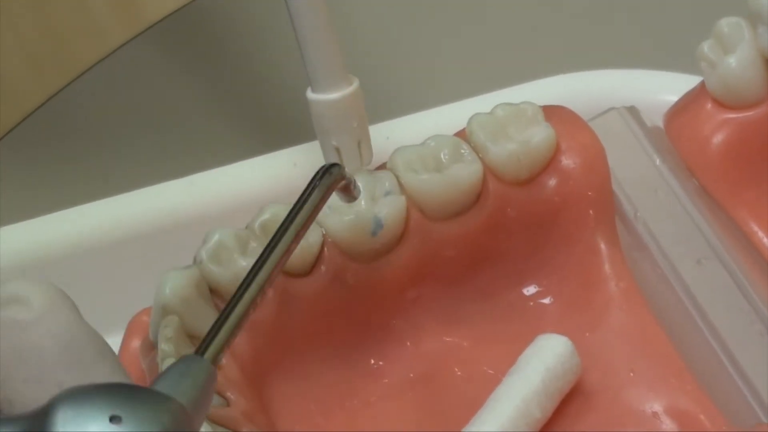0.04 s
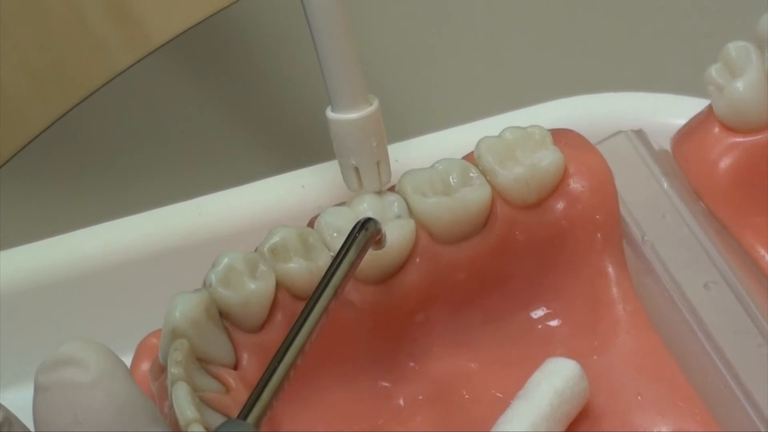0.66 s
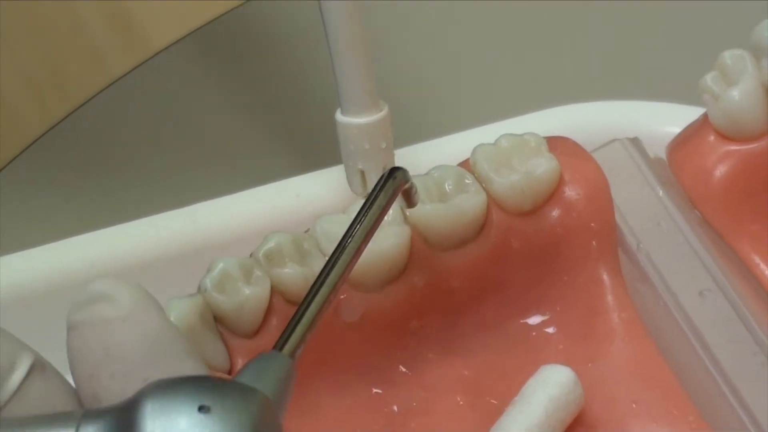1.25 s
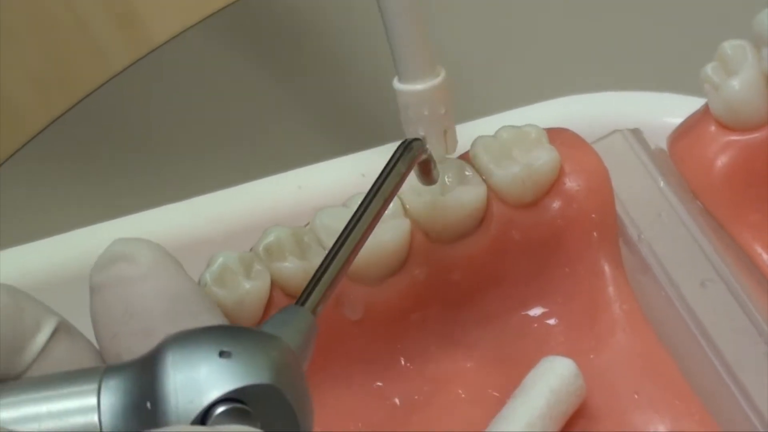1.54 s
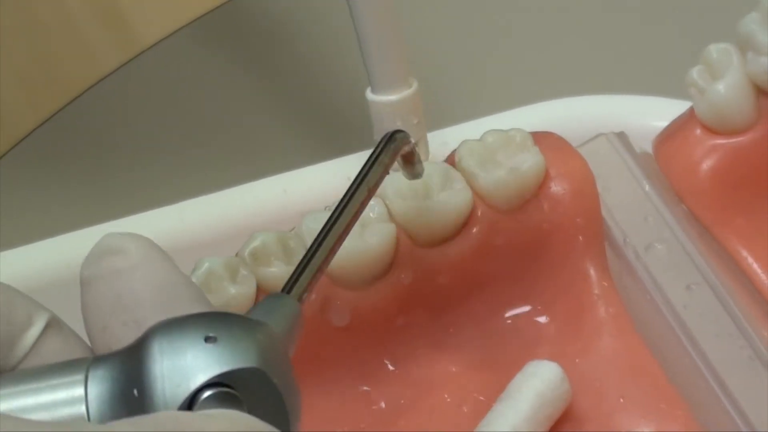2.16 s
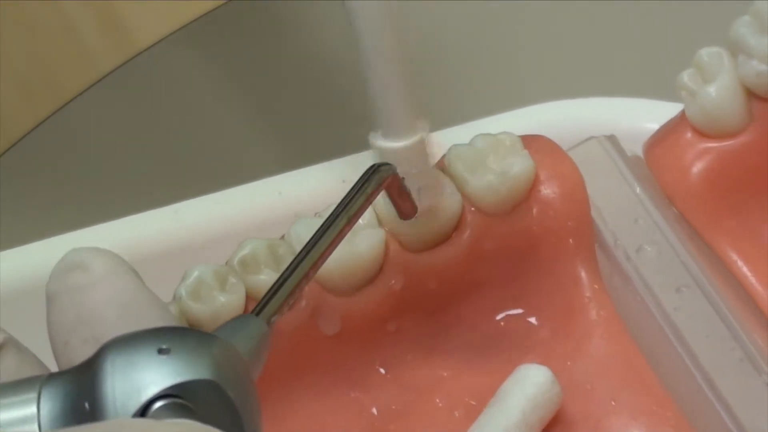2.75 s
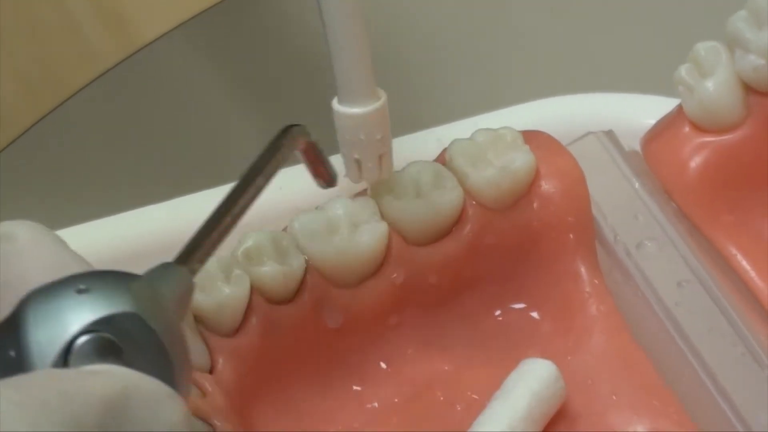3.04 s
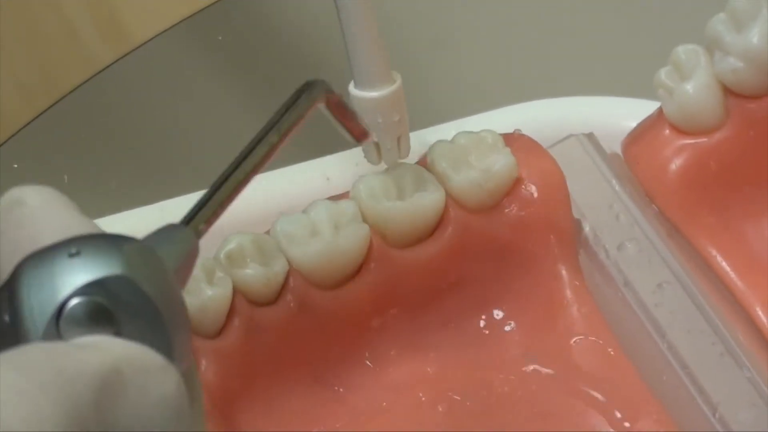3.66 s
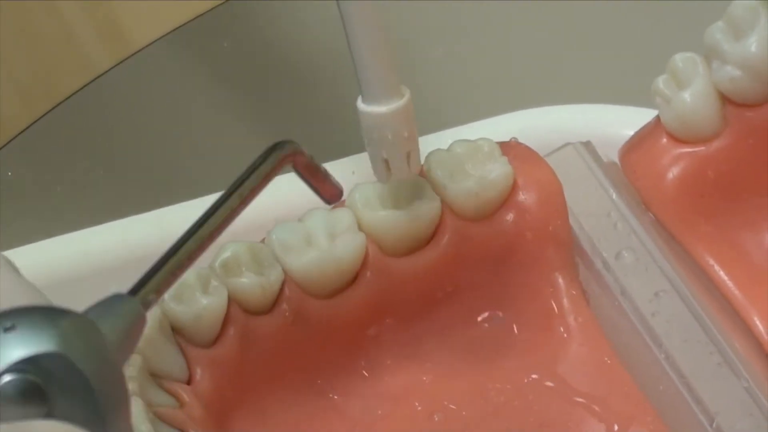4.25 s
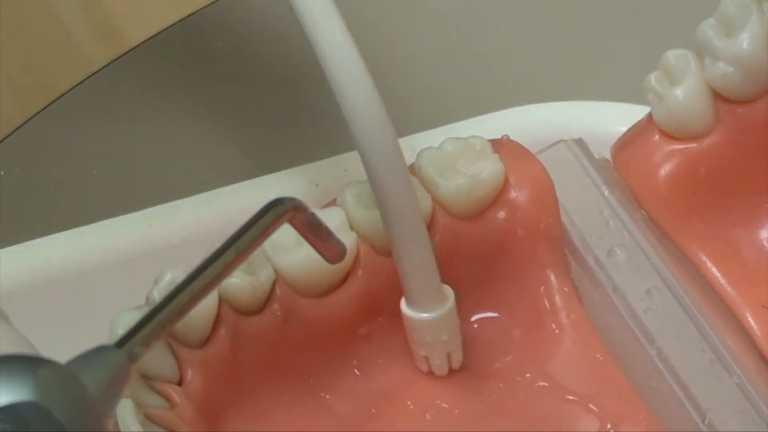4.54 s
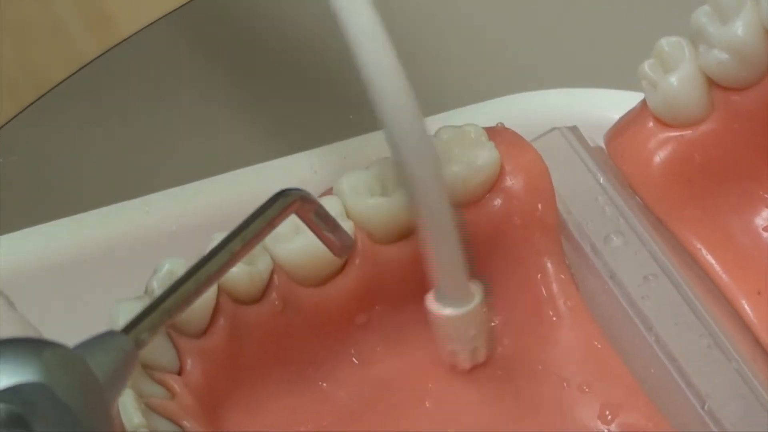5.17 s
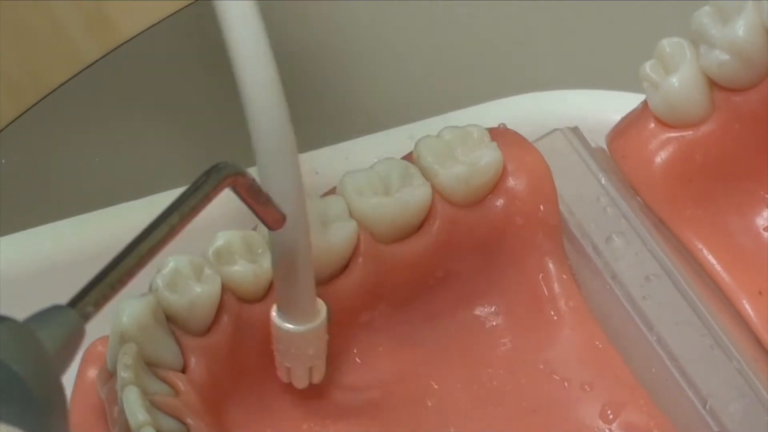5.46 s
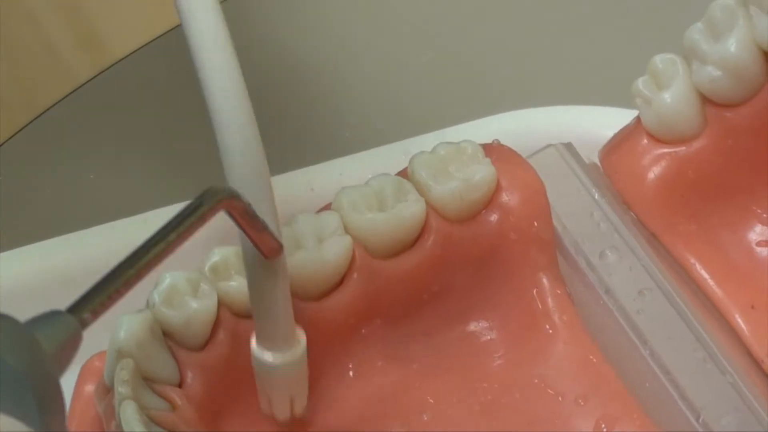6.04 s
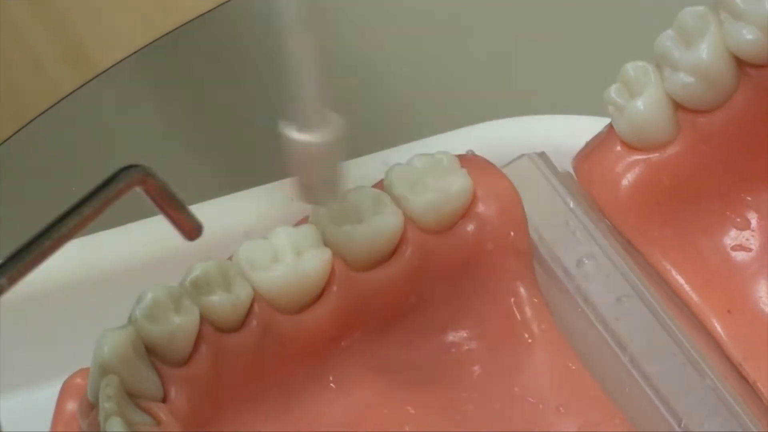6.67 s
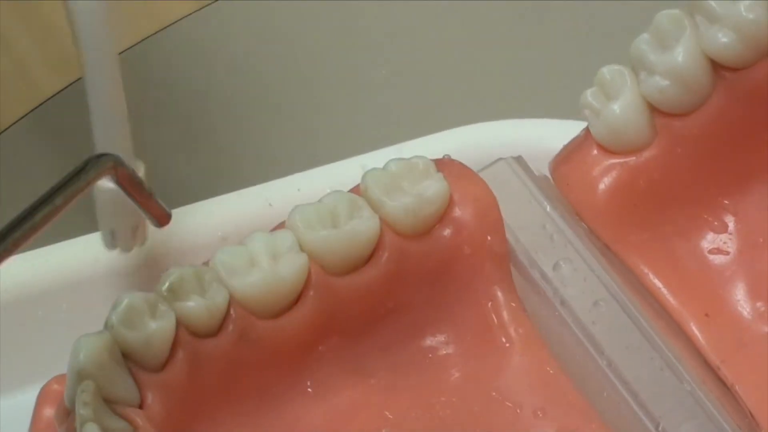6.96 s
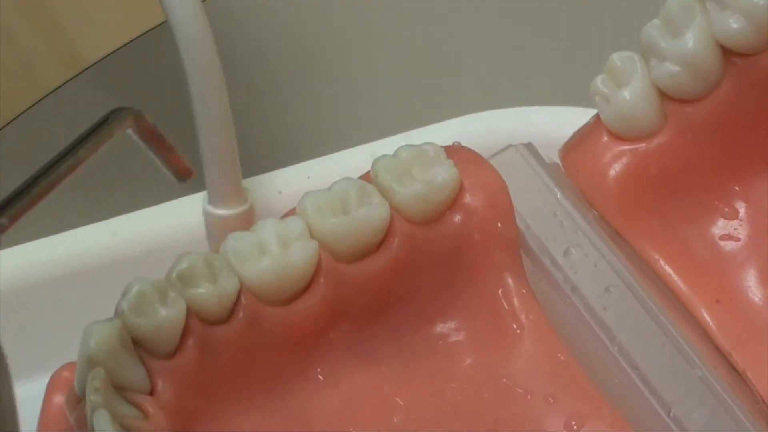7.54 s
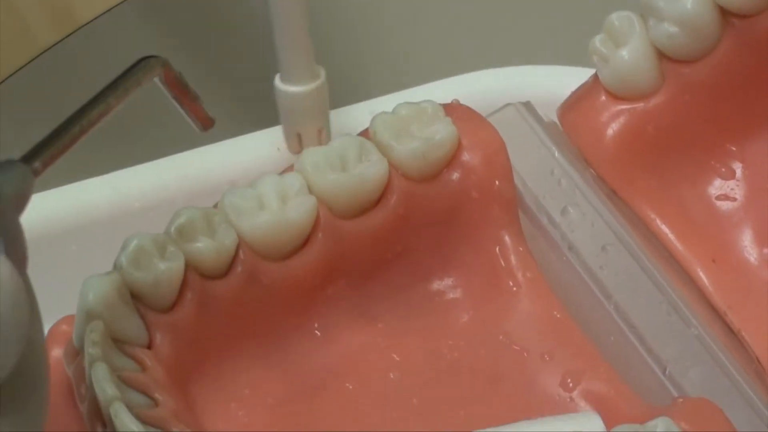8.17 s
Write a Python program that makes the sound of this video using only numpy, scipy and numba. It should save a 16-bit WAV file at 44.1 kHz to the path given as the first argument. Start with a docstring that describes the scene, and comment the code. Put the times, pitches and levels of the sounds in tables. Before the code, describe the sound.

Close to the microphone and centred, air tears through the slots of a dental suction tip in a high, shimmering hiss. Spray from an air-water syringe rushes over plastic teeth in uneven gusts. Midway the suction whistles more and slurps water in brief sizzles while the tip knocks on the model jaw; then the taps fade back and the hiss carries on. The room adds a low electrical hum and soft ventilation.

```python
"""Dental suction and rinse on a training jaw

Close to a plastic jaw, on a camera's stereo microphone, the mouth in the centre.
Air hisses and whistles through a suction tip's slots, water sizzles in them, and the tip taps the jaw,
while the jet of an air-water syringe rushes over the teeth. Mains hum and ventilation lie underneath
and duck as the camera's gain control follows the hiss."""
import sys
import numpy as np
from scipy import signal
from scipy.fft import rfft, irfft
from scipy.io import wavfile
from scipy.ndimage import uniform_filter1d
from numba import njit

SR = 44100
rng = np.random.default_rng(int(sys.argv[2]) if len(sys.argv) > 2 else 0)


def output_pcm(signal):
    """Save a mono or channel-first signal as 16-bit PCM at the path in sys.argv[1].

    Samples are clipped to [-1, 1] before scaling.
    """
    pcm = np.clip(np.atleast_2d(signal).T, -1, 1) * 32767
    wavfile.write(sys.argv[1], SR, np.round(pcm).astype(np.int16))


N = 366030
FRAME, HOP = 512, 128  # samples
TIME = np.arange(N) / SR
FRAME_S = np.arange(N // HOP + 2) * HOP / SR
BIN_HZ = np.maximum(np.arange(FRAME // 2 + 1), .5)[:, None] * SR / FRAME
SPECTRUM_HZ = np.maximum(np.fft.rfftfreq(N, 1 / SR), 1)

# The jet catches a tooth or hollow; deeper in, the rush reaches lower. Stray air lifts the slots' hiss:
# start_s, end_s, swell_s, level_db, first_edge_hz, last_edge_hz, lift_db
JET_GUSTS = [(0.327, 0.43, 0.036, -57, 2800, 2800, 0), (0.397, 1.195, 0.38, -58.5, 900, 845, 0),
             (0.828, 1.02, 0.055, -52, 2500, 2300, 2.5), (1.64, 2.263, 0.2, -53.5, 1400, 2380, 5),
             (1.966, 2.132, 0.14, -43.5, 3700, 3400, -1), (3.082, 3.627, 0.036, -50, 2180, 2270, 0.5),
             (3.286, 3.64, 0.35, -46, 2840, 2570, 1), (3.59, 3.869, 0.088, -47.5, 1430, 720, 3),
             (4.027, 4.23, 0.1, -52, 614, 674, 1), (4.54, 4.89, 0.18, -64, 3560, 3930, 2.5),
             (4.4, 5.417, 0.11, -54, 3200, 3680, 0), (5.64, 5.935, 0.28, -51.5, 1800, 2040, -3.5),
             (6.177, 6.54, 0.19, -67, 3500, 4200, 5), (6.227, 6.246, .02, -50.5, 2100, 2100, 3),
             (6.544, 6.607, 0.034, -50, 3300, 3500, 2), (6.74, 7.038, 0.17, -50.5, 2350, 2160, 3),
             (7.215, 7.38, 0.083, -59, 2000, 1800, -2.5), (7.202, 8.304, 0.062, -58.5, 1700, 1230, 2)]


def amp(db):
    """Decibels to gain."""
    return 10 ** (np.asarray(db) / 20)


def controls(table):
    """A curve per frame for each column that follows the table's time column."""
    times_s, *columns = np.transpose(table)
    return [np.interp(FRAME_S, times_s, column) for column in columns]


def colour(table, hz):
    """A spectrum in dB, straight between its points on a log-frequency axis."""
    points_hz, db = np.transpose(table)
    return np.interp(np.log(hz), np.log(points_hz), db)


def bump(hz, width_hz):
    """A bell-shaped resonance of height 1."""
    return np.exp(-((BIN_HZ - hz) / width_hz) ** 2)


def wander(width_hz, seconds):
    """Smooth random patches of the given width and length, with a spread of 1."""
    field = rng.standard_normal((len(BIN_HZ), len(FRAME_S)))
    for _ in range(2):
        field = uniform_filter1d(field, max(1, int(width_hz * FRAME / SR)), axis=0)
        field = uniform_filter1d(field, max(1, int(seconds * SR / HOP)), axis=1)
    return field / field.std()


def turbulence(db):
    """Noise with a moving spectrum, given in dB per Hz."""
    white = rng.standard_normal((len(FRAME_S) - 1) * HOP) * np.sqrt(SR / 2)
    frames = signal.stft(white, nperseg=FRAME, noverlap=FRAME - HOP)[2]
    return signal.istft(frames * amp(db), nperseg=FRAME, noverlap=FRAME - HOP)[1][:N]


def shape(x, db):
    """Pass a sound through a steady response, given in dB along SPECTRUM_HZ."""
    return irfft(rfft(x) * amp(db), N)


def room(hum_trim_db=-0.5, side_db=-16):
    """Steady hum in the centre, and ventilation noise that differs slightly between left and right."""
    # Mains hum and a motor shaft: pitch_hz, level_db
    hum_tones = [(59.24, -45), (119.97, -30.2), (215.4, -54), (239.94, -60)]
    # Ventilation noise: frequency_hz, level_db_per_hz
    ventilation = [(25, -80), (70, -69), (160, -70), (215, -66), (290, -68.5), (370, -67.5), (450, -64.5),
                   (500, -74), (620, -68.5), (900, -70.5), (1400, -101), (5000, -107)]
    hum = sum(amp(db) * np.sqrt(2) * np.sin(2 * np.pi * (hz * TIME + rng.random()))
              for hz, db in hum_tones)
    white = rng.standard_normal((2, N)) * np.sqrt(SR / 2)
    mid, side = shape(white, colour(ventilation, SPECTRUM_HZ))
    return amp(hum_trim_db) * hum + mid + amp(side_db) * np.array([side, -side])


def tip_resonances():
    """The tip's short tube colours the air noise, and narrow gaps open, sing and close again (dB)."""
    # The tube's peaks and dips: centre_hz, width_hz, gain_db
    tube_ripple = [(2800, 200, 1.8), (3600, 200, 1.6), (4900, 230, -1.5), (5800, 180, -1.5),
                   (6150, 200, 1.8), (6550, 200, -1.5), (7000, 200, 1.8), (7400, 180, -1.2),
                   (7780, 180, 1.5), (8280, 220, -2.6)]
    # Gaps between tip, water and tooth: start_s, end_s, first_hz, last_hz, width_hz, boost_db
    gap_whistles = [ (1.262, 1.307, 5150, 5600, 240, 18), (1.575, 1.8, 10400, 9900, 1300, 5),
                    (2.374, 2.95, 10000, 9800, 1600, 4), (3.128, 3.27, 6400, 6300, 500, 5.5),
                    (3.45, 3.69, 4330, 4550, 445, 4.5), (3.85, 4.45, 15200, 15100, 600, 1),
                    (4.377, 5.503, 4400, 4550, 260, 7.5), (4.45, 6.65, 8400, 8300, 330, 5),
                    (4.95, 6.2, 12800, 12300, 700, 2.5), (6.148, 6.7, 4600, 4560, 300, 6),
                    (6.84, 7.065, 7200, 7500, 600, 2.5), (7.05, 7.263, 5350, 5750, 900, 7.5),
                    (7.253, 7.55, 11200, 10800, 450, 6.5), (7.242, 7.43, 13200, 14700, 500, 8),
                    (7.53, 7.68, 5900, 6100, 600, 4), (7.503, 7.76, 12200, 12800, 750, 9.5),
                    (7.79, 8.3, 11400, 12500, 900, 4.5)]
    db = sum(gain_db * bump(hz, width_hz) for hz, width_hz, gain_db in tube_ripple)
    for start, end, first_hz, last_hz, width_hz, boost_db in gap_whistles:
        progress = np.clip((FRAME_S - start) / (end - start), 0, 1)
        opening = np.sqrt(np.abs(np.sin(np.pi * progress)))
        pitch_hz = first_hz + (last_hz - first_hz) * progress
        db = db + boost_db * opening * bump(pitch_hz, width_hz)
    return db


def suction(ring_db, slot_width_hz=700, gulp_half_s=0.063, film_db=0.94, shimmer_db=1.4, flutter_db=.5):
    """Air tears through the tip's slots, harder when the jet blows across them."""
    # The draw as the tip moves from molars to gum to rim: time_s, level_db, sizzle_db, slot_db
    tip_draw = [(0, -50, 3, 5.5), (0.78, -47.5, 5, 7.5), (0.92, -50, -1, 11.5), (1.2, -47.5, 2, 9),
                (1.5, -52.5, 9.5, 7.5), (2.05, -44.5, -1, 2), (2.4, -50, 10, 6.5), (2.78, -48.5, 3.5, 0.5),
                (3.35, -43.5, 3, 7), (3.98, -48, 4, 3), (4.42, -51, 4.5, 3.5), (4.65, -44.5, 0.5, 7.5),
                (5.12, -46.5, 5.5, 7), (5.5, -46.5, 2, 6), (5.88, -43, -3, 7), (6.5, -47.5, 5, 4.5),
                (6.7, -49.5, 7, 2.5), (7.12, -53, 6.5, 7), (7.42, -49, -1, 1), (7.92, -54, 1.5, 5.5),
                (8.3, -46, 8, 6.5)]
    # The slot resonance, higher when the tip sits on the wet gum: time_s, pitch_hz
    slot_pitch = [(0, 7000), (2.3, 7360), (3.3, 7330), (4.4, 7600), (4.58, 7510), (6.5, 7350), (6.75, 7130)]
    # Colour of the hiss: frequency_hz, gain_db
    hiss_colour = [(300, -33.5), (600, -30.5), (900, -13.5), (1400, -26.5), (2200, -18.5), (2800, -15),
                   (3200, -13.5), (3600, -11), (4900, -12), (6200, -4.5), (8300, 0.5), (9200, 1.5),
                   (11500, -3), (15800, -10), (17500, -36)]
    # Gulps of water sizzle in the slots: time_s, treble_boost_db
    gulps = [(1.36, 4.5), (2.93, 6.5), (4.48, 10), (5.04, 5.5), (5.28, 2.5), (5.54, 4.5), (6.05, 1),
             (6.63, 0)]
    level_db, sizzle_db, slot_db = controls(tip_draw)
    slot_hz, = controls(slot_pitch)
    treble = np.clip((BIN_HZ - 9500) / 4500, 0, 1)
    gulp_db = sum(boost_db * np.exp(-((FRAME_S - s) / gulp_half_s) ** 2) for s, boost_db in gulps)
    lift_db = sum(db * gust(start, end, swell_s) for start, end, swell_s, *_, db in JET_GUSTS)
    hiss_db = level_db + colour(hiss_colour, BIN_HZ) + ring_db
    hiss_db += (sizzle_db + gulp_db) * treble
    hiss_db += lift_db * (1 - 0.9 * treble)  # stray air barely lifts the top
    hiss_db += (slot_db + 0.24 * lift_db) * bump(slot_hz, slot_width_hz)
    # The shifting water film makes the treble shimmer and the flow flutter.
    hiss_db += (film_db + shimmer_db * treble) * wander(width_hz=650, seconds=0.066)
    hiss_db += flutter_db * wander(width_hz=5200, seconds=.012)
    return turbulence(hiss_db)


def hose(x, peak_db=4.0, valley_db=-1.33, width_hz=24):
    """The suction hose's air column combs the middle of the hiss."""
    # Standing waves in the hose: pitch_hz
    standing_waves = [1351, 1462, 1552, 1622, 1743, 1860, 1985, 2070, 2173, 2255, 2345, 2540, 2793]
    comb = sum(np.exp(-((SPECTRUM_HZ - hz) / width_hz) ** 2) for hz in standing_waves)
    in_band = (SPECTRUM_HZ > standing_waves[0] - 150) & (SPECTRUM_HZ < standing_waves[-2])
    return shape(x, peak_db * comb + valley_db * in_band)


def syringe_rush(ring_db, spray_db=-69.5, spray_edge_hz=660, spatter_db=1.32):
    """The free jet sprays throughout and rushes on the teeth gust by gust, broken up by droplets."""
    # Colour of the rush: frequency_hz, gain_db
    rush_colour = [(700, -1.5), (1600, 0.5), (2200, -1.5), (2800, 1.5), (3300, -0.5), (4400, 0), (5000, 0),
                   (6200, 2), (8300, 3), (16000, -42)]
    power = amp(spray_db) ** 2 * hollow(spray_edge_hz) * np.ones(len(FRAME_S))
    for start, end, swell_s, level_db, first_hz, last_hz, _ in JET_GUSTS:
        strength = amp(level_db) * gust(start, end, swell_s)
        blowing = strength > 0
        edge_hz = np.interp(FRAME_S[blowing], [start, end], [first_hz, last_hz])
        power[:, blowing] += strength[blowing] ** 2 * hollow(edge_hz)
    droplets_db = spatter_db * wander(width_hz=2100, seconds=.009)
    return turbulence(10 * np.log10(power) + colour(rush_colour, BIN_HZ) + ring_db + droplets_db)


def hollow(edge_hz, steepness=5, focus_db=1.5):
    """A hollow cuts off the noise below its edge and resonates just above it (power gain)."""
    focus = amp(focus_db * bump(1.5 * edge_hz, width_hz=0.11 * edge_hz)) ** 2
    return focus / (1 + (edge_hz / BIN_HZ) ** steepness)


def gust(start, end, swell_s, release_s=0.064):
    """The jet swells onto a tooth, holds, and slips off (0-1)."""
    rise = np.clip((FRAME_S - start) / swell_s, 0, 1)
    return rise * np.clip(1 - (FRAME_S - end) / release_s, 0, 1)


def knock(pitch_spread=0.062, push_s=0.0021):
    """The soft plastic tip meets the jaw, at a slightly different spot each time."""
    # Modes of the plastic jaw: pitch_hz, t60_s, level_db
    jaw_modes = [(784, 0.022, 9), (913, 0.015, 27), (1066, 0.022, 17.5), (1620, 0.022, 0.5)]
    t = TIME[:SR // 16]
    detune = np.exp(pitch_spread * rng.standard_normal())
    ring = sum(amp(db - 60 * t / t60) * np.sin(2 * np.pi * hz * detune * t) for hz, t60, db in jaw_modes)
    ring *= 1 - np.exp(-(t / push_s) ** 2)  # soft contact rounds the attack
    return ring / np.abs(ring).max()


def taps(faint_db=-29, faint_count=90):
    """A few clear taps among many faint ones as the tip is dragged along."""
    # Clear knocks of the tip on the jaw: time_s, peak_db
    clear_taps = [(0.119, -22), (1.482, -27), (2.49, -23), (2.56, -20), (2.742, -13.5), (2.868, -18),
                  (4.366, -23), (4.443, -32.5), (4.598, -5), (4.748, -13.5), (5.007, -16), (5.27, -14),
                  (6.172, -9.5), (6.562, -21), (7.097, -22)]
    times_s = rng.uniform(0, TIME[-1], faint_count)
    peaks_db = faint_db + rng.uniform(-6, 6, faint_count)
    out = np.zeros(N + SR)
    for time_s, peak_db in [*clear_taps, *zip(times_s, peaks_db)]:
        tap = amp(peak_db) * knock()
        at = int(time_s * SR)
        out[at:at + len(tap)] += tap
    return out[:N]


def scene(side_delay_s=.007):
    """The mouth is close and central; a faint, delayed, coloured copy gives it a little stereo width."""
    # Stereo width, nearly mono but slightly wider at 6-10 kHz: frequency_hz, side_re_mid_db
    stereo_width = [(900, -46), (3500, -75), (4500, -66), (5700, -60), (6600, -19.5), (8200, -31.5),
                    (10000, -24.5), (11300, -49), (13000, -52)]
    ring_db = tip_resonances()
    mouth = hose(suction(ring_db) + syringe_rush(ring_db)) + taps()
    delayed = np.interp(TIME - side_delay_s, TIME, mouth, left=0)
    side = shape(delayed, colour(stereo_width, SPECTRUM_HZ))
    return mouth + np.array([side, -side]) + room()


@njit
def follow(power, rise, fall):
    """The gain control's level detector, with separate rates per sample up and down."""
    out = np.empty(len(power))
    envelope = power[:500].mean()
    for i in range(len(power)):
        envelope += (power[i] - envelope) * (rise if power[i] > envelope else fall)
        out[i] = envelope
    return out


def record(dry):
    """The camera's gain control holds the hiss nearly level; peaks clip and the top is cut."""
    threshold_db, ratio, makeup_db = -13.2, 8, .7
    attack_s, release_s, top_hz = .012, .062, 15850
    power = uniform_filter1d(np.mean(dry ** 2, axis=0), size=300)
    envelope = follow(power, 1 / (attack_s * SR), 1 / (release_s * SR))
    excess_db = np.maximum(10 * np.log10(envelope + 1e-12) - threshold_db, 0)
    gain_db = makeup_db - uniform_filter1d(excess_db, size=400) * (1 - 1 / ratio)
    low_pass = signal.ellip(12, .1, 80, top_hz, fs=SR, output="sos")
    return signal.sosfilt(low_pass, np.clip(dry * amp(gain_db), -1, 1))


dry = scene()
out = record(dry)
output_pcm(out)
```